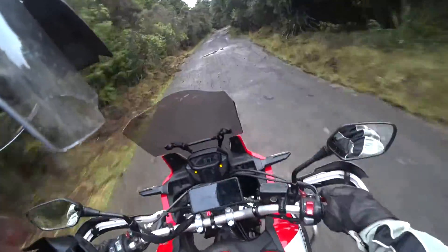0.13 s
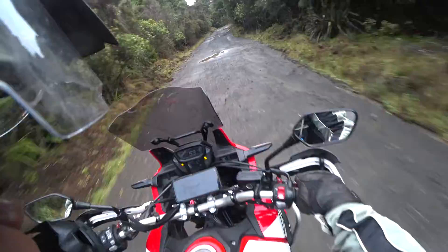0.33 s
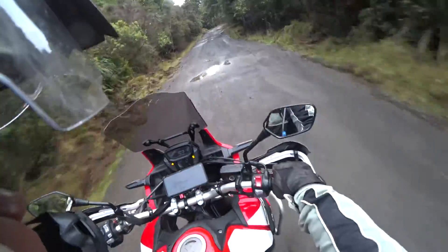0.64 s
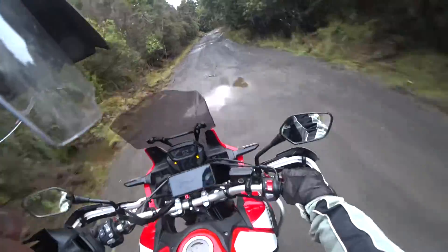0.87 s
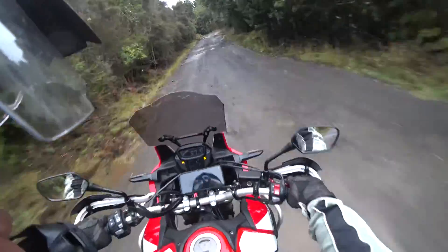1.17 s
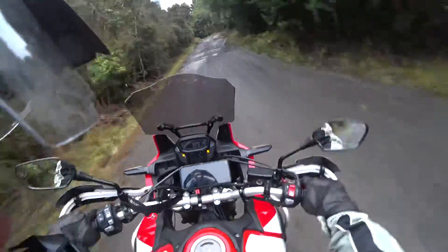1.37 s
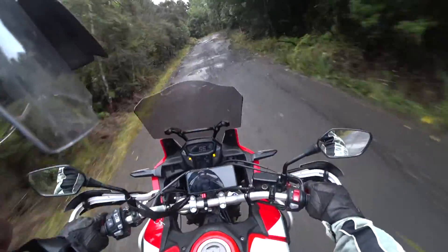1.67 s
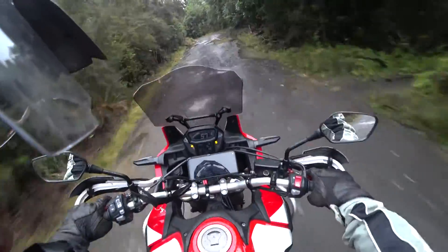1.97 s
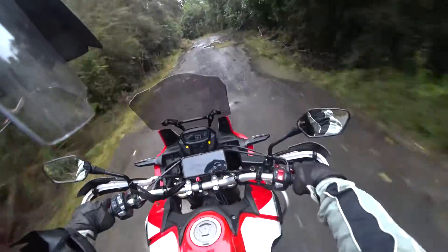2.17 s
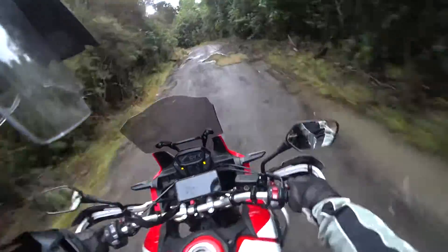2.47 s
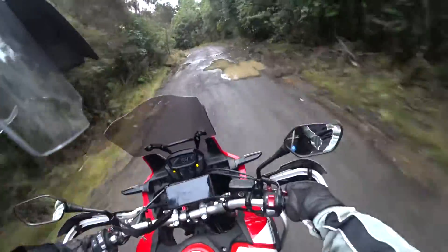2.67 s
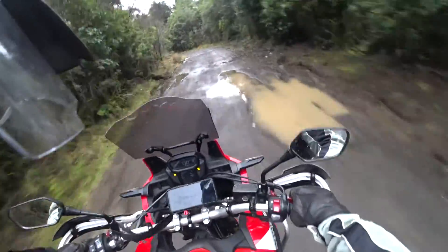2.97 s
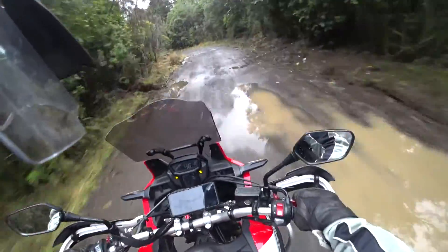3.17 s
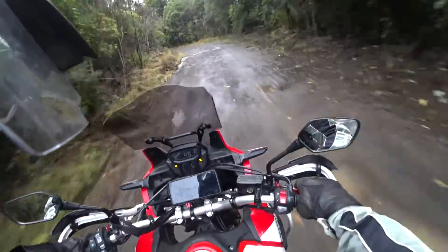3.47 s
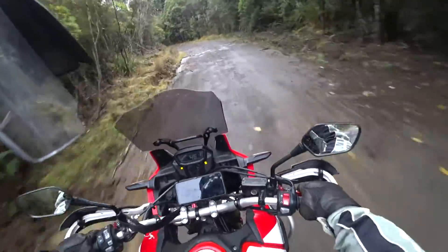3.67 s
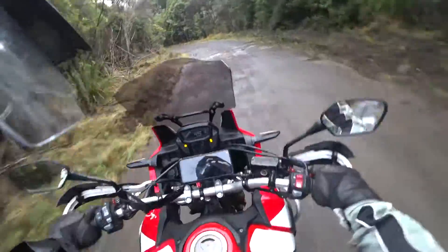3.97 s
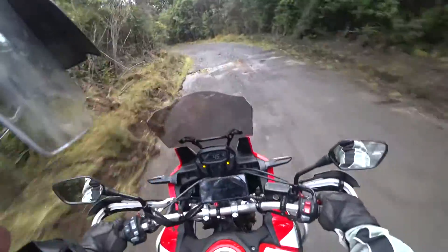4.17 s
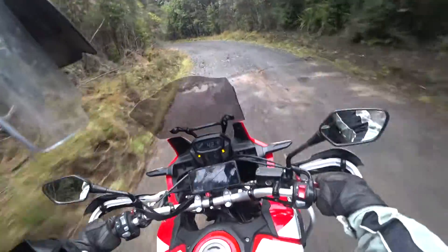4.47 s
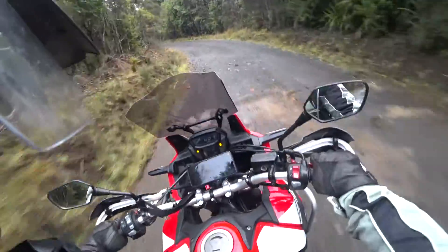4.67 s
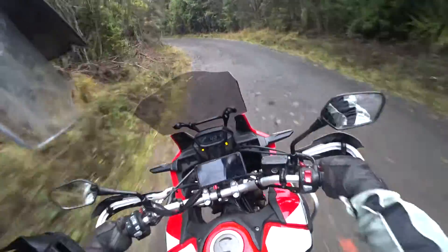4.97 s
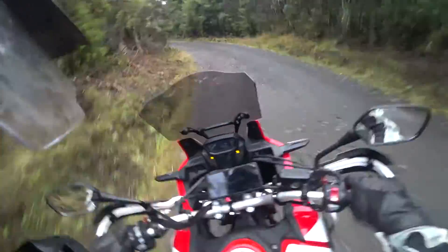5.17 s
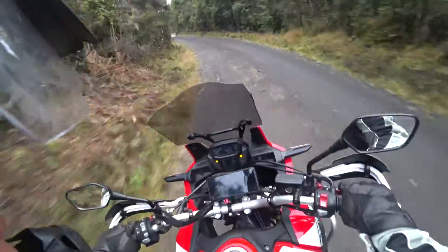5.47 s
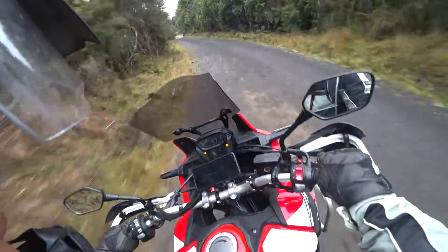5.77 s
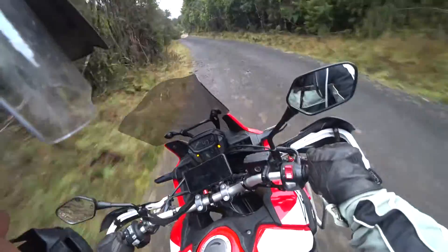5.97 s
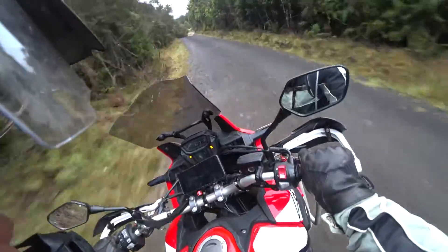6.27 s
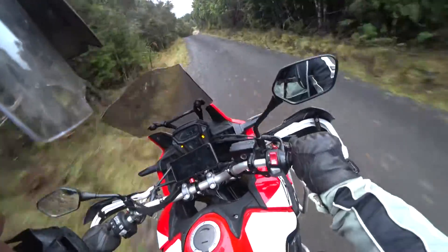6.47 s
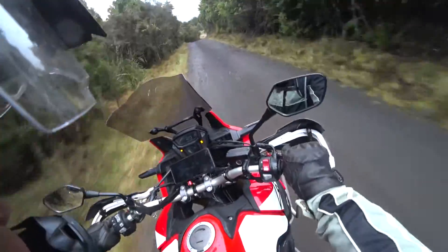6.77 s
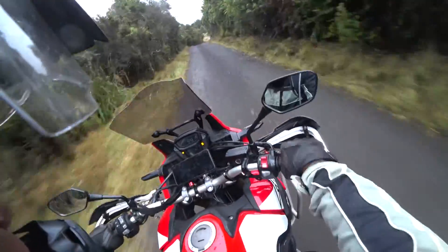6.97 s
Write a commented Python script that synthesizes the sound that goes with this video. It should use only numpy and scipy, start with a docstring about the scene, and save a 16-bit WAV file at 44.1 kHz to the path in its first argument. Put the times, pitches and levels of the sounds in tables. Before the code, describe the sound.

Close helmet microphone on a moving motorcycle outdoors. Low, rumbling wind buffets constantly and slaps into overload. Beneath it a twin-cylinder engine throbs unevenly, falling in pitch toward the middle and climbing at the end. Thin air rush and road-spray hiss flutter above, with short plasticky knocks and a few dull bump thuds.

```python
"""Motorcycle ride, helmet camera

Wind buffets two microphone ports in opposite sense and overloads them: shaped noise, gust humps and swings.
Under it a twin-cylinder engine's firing pulses ring the exhaust, engine cases and air box.
Coloured noise gives the rush of air, wet-road spray and clatter, plus a faint whirr.
Decaying rings and clicks make housing knocks, one strong firing and a wind slap's edge; low thuds are bumps."""
import sys
import numpy as np
from scipy import signal
from scipy.fft import rfft, irfft
from scipy.io import wavfile
from scipy.ndimage import uniform_filter1d

SR = 44100
rng = np.random.default_rng(int(sys.argv[2]) if len(sys.argv) > 2 else 0)


def wav_out(sig):
    """Save sig, one row per channel (or a flat mono array), as 16-bit PCM at SR to the path in sys.argv[1]."""
    wavfile.write(sys.argv[1], SR, np.round(np.clip(np.atleast_2d(sig).T, -1, 1) * 32767).astype(np.int16))


N = 313992
TIME, BINS = np.arange(N) / SR, np.fft.rfftfreq(N, 1 / SR)


def gain_of(db):
    """Amplitude gain of a level in dB."""
    return 10 ** (np.asarray(db) / 20)


def evened(x):
    """Scales to rms 1."""
    return x / np.sqrt(np.mean(x ** 2) + 1e-20)


def read(points, hz):
    """A spectrum table, joined on a log-frequency axis."""
    f, value = np.transpose(points)
    return np.interp(np.log(hz + 1), np.log(f + 1), value)


def follow(rows):
    """The columns of a curve table, joined in time."""
    s, *columns = np.transpose(rows)
    return [np.interp(TIME, s, column) for column in columns]


def wander(slow_hz, fast_hz):
    """Random drift of rms 1 between two rates."""
    shape = BINS / (BINS + slow_hz) / (1 + (BINS / fast_hz) ** 2)
    return evened(irfft(rfft(rng.standard_normal(N)) * shape, N))


def decayed(fired, seconds):
    """Each firing starts an exponential decay with this time constant."""
    return signal.lfilter([1], [1, -np.exp(-1 / (seconds * SR))], fired)


def patchy(patchy_db, tilt_db, tilt, size):
    """Two unrelated noises sharing one field of drifting patches and one moving tilt."""
    hz, t, z = signal.stft(rng.standard_normal((2, N)), SR, nperseg=size)
    patches = rng.standard_normal(z.shape[1:])
    patches = uniform_filter1d(patches, size=7, axis=0)
    patches = evened(uniform_filter1d(patches, size=9, axis=1))
    moving_tilt = read(tilt, hz)[:, None] * np.interp(t, TIME, tilt_db)
    field_db = patchy_db * patches + moving_tilt
    return signal.istft(z * gain_of(field_db), SR, nperseg=size)[1][:, :N]


def ports(pair, colour, same, lead_rad, left_db, lo_hz, hi_hz):
    """Colours a noise pair and lays it on two ports; scaled by the shared noise's rms in lo-hi."""
    a, b = rfft(pair) * gain_of(read(colour, BINS))
    half = gain_of(left_db / 2)
    right = same * a * np.exp(-1j * lead_rad) + np.sqrt(1 - same ** 2) * b
    placed = irfft(np.array([a * half, right / half]), N)
    band = irfft(a * (BINS > lo_hz) * (BINS < hi_hz), N)
    return placed / np.sqrt(np.mean(band ** 2))


def steadied(pair, seconds, share):
    """Irons out part of the chance swells of a noise pair."""
    size = int(seconds * SR)
    power = uniform_filter1d(uniform_filter1d((pair ** 2).mean(0), size), size)
    return pair * (power / power.mean() + 0.042) ** (-share / 2)


# gusts striking the helmet: (peak time [s], length before stretch [s], lift [dB])
GUST_HUMPS = [(0.141, 0.072, 10.5), (0.923, 0.05, 10.5), (1.236, 0.17, 11.5), (1.533, 0.07, 10),
              (1.677, 0.056, 8.5), (2.217, 0.046, 5.5), (2.474, 0.17, 8.5), (2.604, 0.22, 8),
              (2.87, 0.14, 8.5), (3.072, 0.32, 5.5), (4.11, 0.1, 12.5), (4.307, 0.18, 9.5),
              (4.561, 0.046, 11), (5.206, 0.071, 15), (5.837, 0.15, 16), (6.655, 0.13, 9),
              (6.925, 0.073, 11.5)]


def gusts(stretch):
    """Lift in dB: each gust swells and fades as one rounded hump."""
    lift_db = np.zeros(N)
    for s, length_s, db in GUST_HUMPS:
        place = np.clip(2 * (TIME - s) / (length_s * stretch), -1, 1)
        lift_db += db * np.cos(np.pi / 2 * place) ** 2
    return lift_db


# wind between gusts: (time [s], eddy level [dB], heave level [dB])
WIND_LEVELS = [(0, -21.5, -24), (.55, -16, -25), (1.4, -20, -25), (2.3, -20, -23), (2.8, -14.5, -25),
               (3.4, -20, -25.5), (3.85, -19.5, -25), (4.03, -34.5, -33.5), (4.5, -29.5, -33.5),
               (4.85, -15, -23), (5.4, -21, -22.5), (5.68, -26.5, -33.5), (6, -21, -25.5), (7.12, -18, -29)]
# eddy spectrum: (frequency [Hz], density [dB per Hz])
EDDY_COLOUR = [(8, -30), (30, -9), (98, 1), (212, -2), (260, -6), (330, -8.5), (435, -7.5), (520, -18),
               (2500, -79)]
# eddy balance: (frequency [Hz], left minus right [dB])
EDDY_LEFT = [(100, -3), (190, -2), (500, 0.5)]
EDDY_SAME, EDDY_LEAD_RAD = 1, 3.015  # likeness of the ports, left lead
EDDY_STRETCH, EDDY_LUMPS_DB = 1.49, 2.5


def buffet():
    """Eddies push one port while they pull the other; they come in lumps."""
    lumps_db = EDDY_LUMPS_DB * wander(8.5, 9.4)
    level_db = follow(WIND_LEVELS)[0] + gusts(EDDY_STRETCH) + lumps_db
    speed_db = follow(RUSH_LEVELS)[0] + follow(ROAR_LEVELS)[0]
    # faster air sheds more small, quick eddies; big gusts are mostly large ones
    small_db = 0.92 * (speed_db - speed_db.mean()) - 0.66 * (level_db - level_db.mean())
    pair = patchy(3.33, small_db, [(130, 0.11), (330, 0.99)], size=2048)
    pair = ports(pair, EDDY_COLOUR, EDDY_SAME, EDDY_LEAD_RAD, read(EDDY_LEFT, BINS), 22, 620)
    return gain_of(level_db) * steadied(pair, 0.015, 0.51)


# single large eddies: (time [s], envelope peak [dB], swing rate [Hz], right-port gain [ratio],
# phase advance [turns])
SLAP_EVENTS = [(1.2219, 6.5, 134, -0.84, 0.27), (2.4440, 2.5, 166, -1.08, 0), (5.2075, -0.5, 240, -0.88, 0),
               (6.713, -6, 330, -1.37, 0)]
SLAP_WIDTH_TURNS, RIGHT_LAG_S = .62, .00021


def slaps():
    """An eddy slaps the ports: a short, strong pressure swing, opposite at the two."""
    out = np.zeros((2, N))
    for s, db, hz, right, early in SLAP_EVENTS:
        turns = (TIME - s - np.array([[0], [RIGHT_LAG_S]])) * hz
        envelope = gain_of(db) * np.exp(-(turns / SLAP_WIDTH_TURNS) ** 2)
        out -= envelope * np.cos(2 * np.pi * (turns + early)) * [[1], [right]]
    return out


# heave spectrum: (frequency [Hz], density [dB per Hz])
HEAVE_COLOUR = [(3, -40), (14, 0), (28, 0), (42, -10), (75, -19), (900, -110)]
HEAVE_SHARE, HEAVE_STRETCH = 0.73, 1.93  # share of gust dB, stretch of gust length
HEAVE_LUMPS_DB = 2


def heave():
    """The slowest pressure swings reach both ports together and swell with the gusts."""
    pair = ports(rng.standard_normal((2, N)), HEAVE_COLOUR, .95, 0, -1.2, 8, 45)
    gust_db = HEAVE_SHARE * gusts(HEAVE_STRETCH)
    level_db = follow(WIND_LEVELS)[1] + gust_db + HEAVE_LUMPS_DB * wander(3.5, 11.5)
    return gain_of(level_db) * steadied(pair, 0.037, 0.62)


# engine speed: (time [s], four-stroke cycle rate [Hz])
CYCLE_RATE = [(0, 33), (2, 31.5), (4.5, 24), (6.1, 29.4), (6.4, 31.5), (6.75, 33), (6.93, 35.6),
              (7.12, 36.8)]
FIRING_S = 6.354  # the stronger cylinder fires near this time
WEAK_DB, UNEVEN_DB, JITTER_CYCLES = -4.0, 1.5, .014


def firings():
    """Two firings a cycle, 270 and 450 crank degrees apart, uneven in time and strength."""
    turns = np.cumsum(follow(CYCLE_RATE)[0]) / SR
    turns = turns - turns[round(FIRING_S * SR)] + JITTER_CYCLES * wander(2, 12)
    strong = np.diff(np.floor(turns), prepend=np.inf) > 0
    weak = np.diff(np.floor(turns + 3 / 8), prepend=np.inf) > 0
    return (strong + gain_of(WEAK_DB) * weak) * gain_of(UNEVEN_DB * rng.standard_normal(N))


# exhaust drone: (time [s], level [dB], hum pitch [Hz])
EXHAUST_CURVES = [(0, -23.5, 177.4), (1.02, -29.5, 167.7), (1.8, -26.5, 179), (2.25, -25.5, 171.3),
                  (2.45, -44.5, 169), (3, -28, 181), (3.6, -32, 184.3), (4.5, -31.5, 159), (5.4, -36, 183),
                  (6.07, -28, 166.5), (6.6, -30.5, 179), (7.12, -23.5, 191)]
# pipe resonances: (frequency [Hz], bandwidth [Hz], relative level [dB])
PIPE_MODES = [(84.6, 25.7, -8), (119.5, 25.7, -10)]
HUM_WIDTH_HZ, HUM_DB = 35., -3.5  # hum level relative to pipe ring
PUFF_DECAY_S, PUFF_SHARE = .008, 1.47


def exhaust(fired):
    """Each firing, with a puff of turbulent gas, rings the pipe and a hum whose pitch drifts on its own curve."""
    level_db, hum_hz = follow(EXHAUST_CURVES)
    t = np.arange(4000) / SR
    ring = sum(gain_of(db) * np.exp(-np.pi * width * t) * np.sin(2 * np.pi * hz * t)
               for hz, width, db in PIPE_MODES)
    puffs = .4 + decayed(fired, PUFF_DECAY_S)
    drive = evened(fired) + PUFF_SHARE * evened(puffs * rng.standard_normal(N))
    pipe = evened(signal.oaconvolve(drive, ring)[:N])
    # sliding resonance: shift to 0 Hz, two low-passes, shift back
    turn = np.exp(2j * np.pi * np.cumsum(hum_hz) / SR)
    r = np.exp(-np.pi * HUM_WIDTH_HZ / SR)
    low = signal.lfilter([1 - r], [1, -r], drive / turn)
    hum = (turn * signal.lfilter([1 - r], [1, -r], low)).real
    drone = evened(pipe + gain_of(HUM_DB) * evened(hum))
    return gain_of(level_db + 1.9 * wander(25, 25)) * drone


# air, spray and clatter: (time [s], level of the 2.2-10 kHz part before the roar shift [dB])
RUSH_LEVELS = [(0, -44.5), (.25, -49), (.74, -47), (.9, -48), (1.11, -53.5), (1.28, -47.5), (1.42, -52.5),
               (1.59, -50), (2.2, -49), (3.15, -50), (3.64, -53.5), (4.06, -55), (4.23, -52.5), (4.55, -58),
               (4.8, -53), (5.6, -56.5), (6.22, -50), (6.36, -45), (7.11, -42.5)]
# fine spray: (time [s], tilt near 4 kHz and above 8 kHz, before band weights [dB])
SPRAY_TILT = [(.83, 0.5), (.87, 9), (.94, 12), (.98, 4), (6.3, 7), (7.12, -1.5)]
# roar under 1.5 kHz against the hiss above: (time [s], level [dB])
ROAR_LEVELS = [(0, 0.5), (.2, -1), (3.7, 0), (3.9, 3.5), (4.0, -4), (4.3, 2.5), (4.47, -2), (4.9, -1.5),
               (5.5, -1), (6.05, 2.5), (6.3, -0.5)]
# rush spectrum: (frequency [Hz], density [dB per Hz])
RUSH_COLOUR = [(150, 23.5), (450, 18), (620, 16.5), (844, 24.5), (1110, 14), (1300, 8.5), (1430, 16),
               (1590, 11), (2000, 6), (2600, -4.5), (3400, -11), (4200, -6), (5520, 3.5), (6600, -8),
               (8200, -14.5), (9000, -22.5), (11000, -25)]
# port likeness: (frequency [Hz], likeness [0-1])
RUSH_LIKENESS = [(600, 0.59), (950, 1), (1100, 0.55), (1300, 0.53), (1430, 1), (1620, 0.33), (2200, 0.96),
                 (2500, 0.12), (4000, 0.1), (5500, 0.99), (7000, 0.072), (8000, 0.75), (10500, 0.86)]
# port phase: (frequency [Hz], left lead [rad])
RUSH_PHASE = [(600, 3.1), (1100, 2.1), (1500, 2.5), (2100, 3.2), (2600, .5), (4100, -.5), (4400, 1.7),
              (6800, 1.6), (7500, -.5), (8200, -.1)]
# port balance: (frequency [Hz], left minus right [dB])
RUSH_BALANCE = [(600, 2), (4200, -4.5), (5500, -3), (6300, 3), (11000, 1)]
ROAR_TOP_HZ, THROB_DECAY_S = 1500, .0035


def rush(fired):
    """Wide hiss that flutters with the air and throbs with each firing, more so when loud."""
    level_db, top_db = follow(RUSH_LEVELS)[0], follow(SPRAY_TILT)[0]
    depth = 2.4 * gain_of(1.2 * (level_db - level_db.max()))
    tilt = [(2500, 0.43), (3900, 1.0), (5000, 0.0089), (8000, 0.83)]
    pair = patchy(1.0, top_db, tilt, size=512)
    pair = pair * (1 + depth * decayed(fired, THROB_DECAY_S)) * gain_of(0.94 * wander(0.43, 15))
    same, lead_rad = read(RUSH_LIKENESS, BINS), read(RUSH_PHASE, BINS)
    placed = ports(pair, RUSH_COLOUR, same, lead_rad, read(RUSH_BALANCE, BINS), 2220, 10000)
    roar = irfft(rfft(placed) / (1 + (BINS / ROAR_TOP_HZ) ** 4), N)
    return gain_of(level_db) * (placed + (gain_of(follow(ROAR_LEVELS)[0]) - 1) * roar)


# engine case modes: (frequency [Hz], relative level [dB], t60 [s])
CASE_MODES = [(607, -1.5, 0.016), (994, -0.5, 0.0068), (1674, -12, 0.035)]
CASES_DB = -35.5  # left-port level at the loudest rush
ENGINE_FOLLOW = 1.25  # dB lost per dB the rush drops
CLATTER_DECAY_S = .004


def cases(fired):
    """Each firing and its clatter ring the engine cases, opposite at the ports; level follows the rush."""
    t, rush_db = np.arange(2048) / SR, follow(RUSH_LEVELS)[0]
    ring = sum(gain_of(db - 60 * t / t60) * np.sin(2 * np.pi * hz * t) for hz, db, t60 in CASE_MODES)
    clatter = decayed(fired, CLATTER_DECAY_S) * rng.standard_normal(N)
    rung = evened(signal.oaconvolve(fired + 0.09 * clatter, ring)[:N])
    level_db = CASES_DB + ENGINE_FOLLOW * (rush_db - rush_db.max())
    return gain_of(level_db) * rung * [[1], [-.2]]


INTAKE_HZ, INTAKE_WIDTH_HZ, INTAKE_DB = 220, 110, -31.5  # level at the loudest rush


def intake(fired):
    """Each firing thumps the air box cleanly: faint lines that climb with the revs."""
    t, rush_db = np.arange(2048) / SR, follow(RUSH_LEVELS)[0]
    thump = np.exp(-np.pi * INTAKE_WIDTH_HZ * t) * np.sin(2 * np.pi * INTAKE_HZ * t)
    level_db = INTAKE_DB + ENGINE_FOLLOW * (rush_db - rush_db.max())
    return gain_of(level_db) * evened(signal.oaconvolve(fired, thump)[:N])


# blows, at 5.2075 s the sharp edge of a wind slap, at 6.354 s one strong engine firing: (time [s], left-port
# ring-plus-crack peak [dB], hardness as crack over ring, relative [dB], right-port delay [ms], rattle t60 [s])
CRACK_EVENTS = [(1.352, -15, 5, 0.22, .006), (2.369, -17, -18, 0.18, .014), (2.38, -10.5, 11, 0.16, 0.039),
                (2.488, -9, 0, 0.1, 0.016), (3.965, -16, 13, 0.24, 0.016), (4.988, -19.5, 14, 0.12, 0.0083),
                (5.2075, -15.5, 3, 0.16, 0.0078), (5.756, -10, -3, 2.1, .012),
                (5.84, -15.5, 2, 1.41, 0.013), (6.354, -13.5, -8, 0.18, 0.049)]
# ring modes: (frequency [Hz], relative level [dB], t60 [s])
RING_MODES = [(440, 11.5, 0.0066), (805, 24.5, 0.0051), (1576, 6.5, 0.019), (2350, -3, 0.0093)]
# crack spectrum: (frequency [Hz], density [dB per Hz])
CRACK_COLOUR = [(300, -5), (900, 8), (1650, 0), (2500, -9.5), (5000, -12.5), (7500, -20), (11000, -36)]
LEAD_IN_S = .005  # room for each crack's soft onset
FAR_PORT_HZ, FAR_GAIN = 2190, -.85


def cracks_and_rings():
    """A click with a short rattle plus decaying modes; the far port is inverted, duller and later."""
    out, t, hz = np.zeros((2, N + 3000)), np.arange(2048) / SR, np.fft.rfftfreq(2048, 1 / SR)
    for s, db, hard_db, delay_ms, rattle_s in CRACK_EVENTS:
        ring = np.zeros(len(t))
        for f, mode_db, t60 in RING_MODES:
            level_db = mode_db + 1.5 * rng.standard_normal()
            ring += gain_of(level_db - 60 * t / t60) * np.sin(2 * np.pi * f * t)
        rattle = rng.standard_normal(len(t)) * gain_of(-60 * t / rattle_s)
        crack = irfft(rfft(6.1 * (t == 0) + rattle) * gain_of(read(CRACK_COLOUR, hz)))
        soft_ring = evened(ring * (1 - np.exp(-t / 0.00035)))
        sound = soft_ring + gain_of(hard_db - 13.5) * evened(crack)
        near = gain_of(db) * np.roll(sound, round(LEAD_IN_S * SR)) / abs(sound).max()
        far = irfft(rfft(near) / np.sqrt(1 + (hz / FAR_PORT_HZ) ** 4))
        start_s = s - LEAD_IN_S
        out[0, round(start_s * SR):][:len(t)] += near
        out[1, round((start_s + delay_ms / 1000) * SR):][:len(t)] += FAR_GAIN * far
    return out[:, :N]


# road bumps: (time [s], peak of the 140 Hz swing [dB])
JOLT_EVENTS = [(2.4749, -8), (4.06, -17.5), (5.212, -11.5)]


def jolts():
    """A bump travels up through rider and helmet as a short low thud."""
    out, t = np.zeros(N), np.arange(4000) / SR
    swing = (1 - np.exp(-t / 0.007)) * gain_of(-60 * t / 0.05) * np.sin(2 * np.pi * 140 * t)
    upper = 0.25 * gain_of(-60 * t / 0.01) * np.sin(2 * np.pi * 340 * t)
    thud = swing / abs(swing).max() + upper
    for s, db in JOLT_EVENTS:
        out[round(s * SR):][:len(t)] -= gain_of(db) * thud
    return out


WHIRR_HZ, WHIRR_HALF_WIDTH_HZ = 2470, 440
WHIRR_DB, WHIRR_FOLLOW = -59.5, 0.22  # level at mean rush, dB per dB of rush


def whirr():
    """A fuzzy narrow band, unrelated at the two ports, that changes little with the rush."""
    rush_db = follow(RUSH_LEVELS)[0]
    band = np.exp(-((BINS - WHIRR_HZ) / WHIRR_HALF_WIDTH_HZ) ** 2)
    pair = evened(irfft(rfft(rng.standard_normal((2, N))) * band, N))
    level_db = WHIRR_DB + WHIRR_FOLLOW * (rush_db - rush_db.mean()) + 2.0 * wander(3, 30)
    return gain_of(level_db) * pair


def scene():
    """Sums wind, engine, rush, cracks and bumps at the two ports."""
    fired = firings()
    wind = buffet() + slaps() + heave()
    engine = exhaust(fired) + cases(fired) + intake(fired)
    return wind + engine + rush(fired) + cracks_and_rings() + jolts() + whirr()


KNEE, CEILING, EDGE_HZ = .9, .995, 11150  # shares of full scale; band limit


def record(dry):
    """Peaks bend over a knee towards full scale; then the band limit."""
    dry = dry - dry.mean(1, keepdims=True)
    room = CEILING - KNEE
    excess = np.maximum(abs(dry) - KNEE, 0)
    bent = np.clip(dry, -KNEE, KNEE) + np.sign(dry) * room * np.tanh(excess / room)
    low_pass = signal.firwin(511, EDGE_HZ, window=("kaiser", 9), fs=SR)
    return signal.oaconvolve(bent, low_pass[None], "same")


dry = scene()
out = record(dry)
wav_out(out)
```